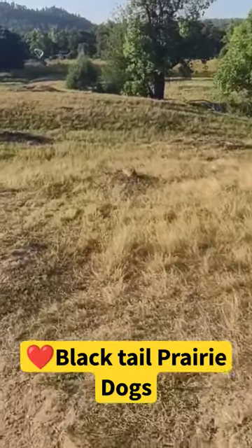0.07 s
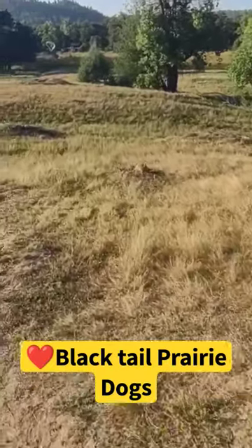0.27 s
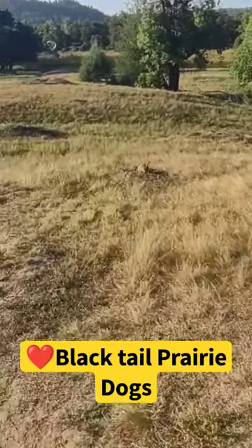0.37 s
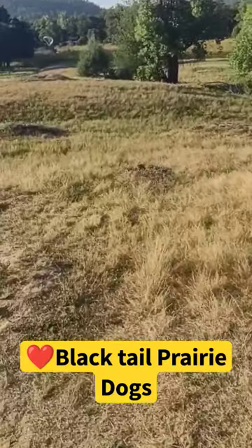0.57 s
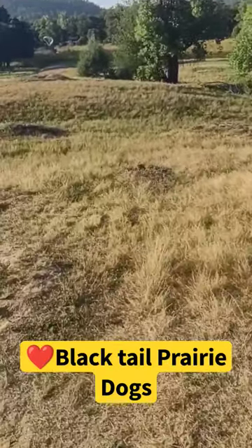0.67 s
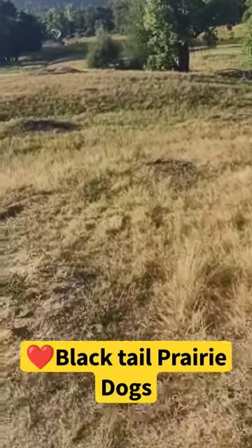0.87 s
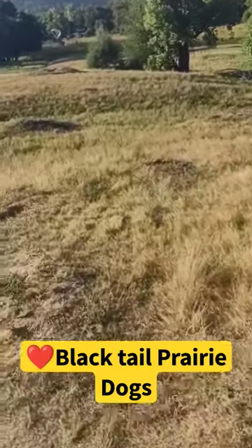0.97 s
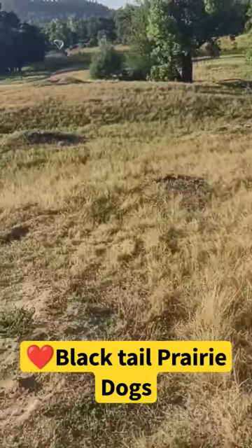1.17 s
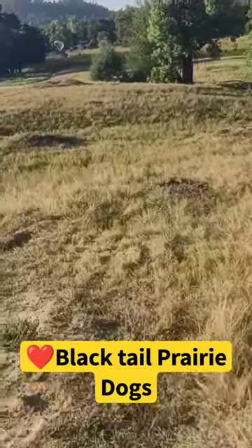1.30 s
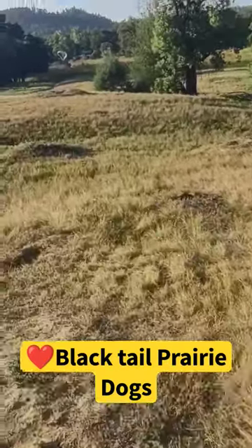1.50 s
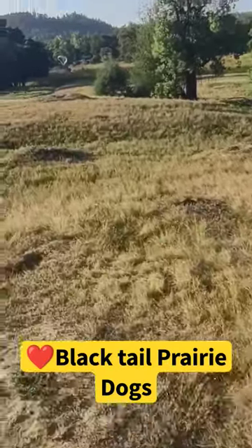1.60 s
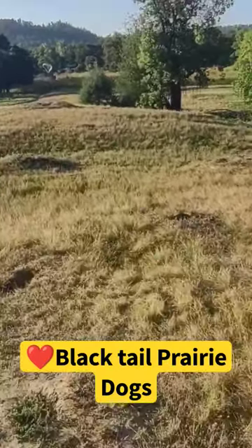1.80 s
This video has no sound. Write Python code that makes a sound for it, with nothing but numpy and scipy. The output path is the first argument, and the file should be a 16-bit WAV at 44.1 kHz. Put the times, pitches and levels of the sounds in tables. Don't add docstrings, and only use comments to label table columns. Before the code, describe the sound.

Two sharp, chirpy rodent barks, each about 0.05 seconds long with a rough, quickly rising and falling pitch near 2 kHz and bright overtones, come at 0.86 and 1.34 seconds, the second stronger. Faint smeared echoes follow from trees. Low wind thuds hit the microphone, heavily on the right from 0.25 to 0.4 and around 0.75-0.85. Grass sweeps and stalks snap near 0.95, another snaps at 1.25, then it quiets to faint hiss.

```python
import sys
import numpy as np
from scipy import signal
from scipy.fft import rfft, irfft
from scipy.io import wavfile
from scipy.ndimage import uniform_filter1d

SR = 44100
rng = np.random.default_rng(int(sys.argv[2]) if len(sys.argv) > 2 else 0)


def ratio_of_db(decibels):
    return 10 ** (np.asarray(decibels, float) / 20)


def transcribe(u):
    v = np.clip(np.atleast_2d(u).T, -1, 1)
    q = np.round(v * 32767).astype(np.int16)
    wavfile.write(sys.argv[1], SR, q)


N = 81585


def unit_rms(x):
    return x / np.sqrt(np.mean(x ** 2) + 1e-20)


def in_time(rows):
    seconds, *columns = np.transpose(rows)
    return [np.interp(np.arange(N) / SR, seconds, column) for column in columns]


def at_hz(points, hz):
    point_hz, value = np.array(points).T
    return np.interp(np.log(hz + 1), np.log(point_hz), value)


def drift(rate_hz):
    r = np.exp(-2 * np.pi * rate_hz / SR)
    wander = signal.lfilter([1], [1, -2 * r, r * r], rng.standard_normal(N + SR))
    return unit_rms(wander[SR:])


def colour(x, spectrum, tilt_db=0):
    hz = np.fft.rfftfreq(N, 1 / SR)
    gain_db = at_hz(spectrum, hz) + tilt_db * np.log2((hz + 1) / 3000)
    return unit_rms(irfft(rfft(x) * ratio_of_db(gain_db), N))


def pan(left_right_db):
    return np.array([[.5], [-.5]]) * left_right_db


# centre in seconds, peak in dB, pitch in Hz, half length in seconds.
LEFT_EDDIES = [(0.027, -27, 130, 0.0045), (0.047, -22.5, 105, 0.0032), (0.066, -29, 150, 0.0059),
               (0.081, -22, 150, 0.0028), (0.101, -23.5, 110, 0.0057), (0.122, -28, 140, 0.0065),
               (0.137, -33.5, 110, 0.0018), (0.281, -26.5, 82, 0.0056), (0.341, -18.5, 160, 0.0027),
               (0.371, -18, 105, 0.01), (0.402, -21, 120, 0.0055), (0.412, -25, 150, 0.0015),
               (0.537, -25.5, 127, 0.003), (0.625, -30.5, 90, 0.008), (0.665, -27.5, 111, 0.01),
               (0.802, -35, 110, 0.005), (0.895, -29.5, 150, 0.0033), (0.925, -37, 160, 0.0062),
               (0.941, -21.5, 92, 0.009), (0.969, -24.5, 150, 0.0021), (1.002, -37, 90, 0.0055),
               (1.033, -26, 130, 0.0066), (1.062, -24, 96, 0.012), (1.087, -15.5, 140, 0.0027),
               (1.102, -29, 150, 0.0036), (1.409, -26, 97, 0.006), (1.568, -42.5, 358, 0.0023)]
RIGHT_EDDIES = [(0.215, -22.5, 130, 0.004), (0.254, -14, 265, 0.0016), (0.262, -5, 110.4, 0.0081),
                (0.283, -16, 235, 0.0067), (0.306, -3.5, 176.8, 0.0045), (0.331, -13, 121.3, 0.003),
                (0.349, -9, 245, 0.0031), (0.359, -6.5, 160, 0.0013), (0.371, -10.5, 203, 0.0022),
                (0.392, -20, 108.7, 0.018), (0.404, -13.5, 220, 0.0028), (0.453, -17.5, 132, 0.0026),
                (0.497, -25.5, 134.6, 0.0092), (0.649, -16.5, 140, 0.0026), (0.694, -15.5, 92.4, 0.0047),
                (0.746, -8.5, 207, 0.0019), (0.758, -14.5, 82, 0.0079), (0.835, -12, 268, 0.0027),
                (0.842, -6, 144.6, 0.0036), (0.853, -22.5, 264, 0.0034), (0.825, -17, 117, 0.0091),
                (0.873, -19.5, 92, 0.0052), (0.931, -25.5, 112, 0.026), (0.971, -13.5, 162, 0.0035),
                (0.993, -16.5, 216, 0.0034), (1.006, -28, 117.5, 0.006), (1.028, -16.5, 136, 0.0013),
                (1.064, -20, 241, 0.003), (1.147, -29, 200, 0.0015), (1.106, -11, 110.5, 0.0044),
                (1.194, -16, 131, 0.004), (1.209, -15, 260, 0.0026), (1.228, -10, 174, 0.0022),
                (1.246, -20, 132, 0.0092), (1.385, -20, 94, 0.0075), (1.464, -23.5, 86.5, 0.0064),
                (1.573, -38.5, 339, 0.0016)]


def buffets(rows):
    tail_stretch = 1.16
    flick_db, flick_follows, flick_ratio, flick_s = -11.5, 0.23, 1.74, .0016
    out, t = np.zeros(N), np.arange(N) / SR
    for centre_s, db, hz, half_s in rows:
        swing_turn, flick_turn = rng.random(2)
        u = t - centre_s
        width = half_s * np.where(u > 0, tail_stretch, 1 / tail_stretch)
        out += ratio_of_db(db) * np.exp(-.5 * (u / width) ** 2) * np.cos(2 * np.pi * (hz * u + swing_turn))
        v = u + half_s / 2
        flick = np.exp(-.5 * (v / flick_s) ** 2) * np.cos(2 * np.pi * (flick_ratio * hz * v + flick_turn))
        out += ratio_of_db(db + flick_db + flick_follows * (db + 11.5)) * flick
    return out


# time in seconds, left level in dB, right level in dB.
GUST = [(0, -38.5, -53), (0.119, -50, -45), (0.182, -49.5, -48.5), (0.252, -52, -16), (0.361, -34.5, -21),
        (.48, -40.5, -33), (.57, -43, -38.5), (.7, -50.5, -28.5), (0.802, -46.5, -29.5),
        (0.919, -31.5, -27.5), (1.05, -37, -23), (1.302, -40, -34.5), (1.396, -41.5, -21.5),
        (1.522, -41.5, -44), (1.65, -48, -51), (1.85, -56, -53.5)]
# frequency in Hz, level in dB per Hz.
WIND_COLOUR = [(25, -35), (50, -5.5), (90, 5), (160, -2), (260, -13.5), (420, -28.5), (800, -41.5),
               (1500, -82.5)]


def wind():
    lump_db, lumps_per_s = 2.5, 30
    ports = []
    for gust_db, eddies in zip(in_time(GUST), (LEFT_EDDIES, RIGHT_EDDIES)):
        lumps = ratio_of_db(lump_db * drift(lumps_per_s)) * rng.standard_normal(N)
        ports.append(ratio_of_db(gust_db) * colour(lumps, WIND_COLOUR) + buffets(eddies))
    return np.array(ports)


# frequency in Hz, level in dB per Hz.
FIELD_COLOUR = [(200, -4.5), (500, -1.5), (1000, -7.5), (2500, -13.5), (3500, -23.5), (6000, -28.5),
                (11000, -32.5), (15500, -33.5)]


def field_hiss():
    level_db, gust_share = -61.5, .3
    left_db, right_db = in_time(GUST)
    swing_db = uniform_filter1d((left_db + right_db) / 2 + 42, size=6000)
    swell = ratio_of_db(level_db + gust_share * swing_db + drift(6.1))
    return swell * colour(rng.standard_normal((2, N)), FIELD_COLOUR)


# start in seconds, peak in dB, pitch in Hz, left-right in dB, crack in dB.
SNAPS = [
    (.225, -45.5, 1400, -12.5, -27.5),
    (.447, -42.5, 2000, -17, -34.5),
    (.945, -33, 1900, 13, -36),
    (0.962, -39, 1400, -4, -29),
    (0.987, -65, 2500, -1.5, -14),
    (1.245, -34, 1200, -4, -17),
    (1.273, -53.5, 3500, -15.5, -22),
    (1.573, -47, 1600, -13.5, -21),
    (1.77, -53.5, 1900, -17, -24),
]


def snaps():
    ring_cycles, crack_s = 7.9, 0.0033
    out, u = np.zeros((2, N + SR)), np.arange(SR // 20) / SR
    for start_s, db, hz, pan_db, crack_db in SNAPS:
        ring = np.sin(2 * np.pi * hz * u) * ratio_of_db(-60 * u * hz / ring_cycles)
        crack = ratio_of_db(crack_db - 20 * u / crack_s) * rng.standard_normal((2, len(u)))
        i = int(start_s * SR)
        out[:, i:i + len(u)] += ratio_of_db(db + pan(pan_db)) * (ring + crack)
    return out[:, :N]


# start in seconds, length in seconds, level in dB, left-right in dB,
# brightness in dB per octave.
SWISHES = [
    (0.338, .06, -70, -21, 1.5),
    (0.37, 0.14, -66.5, -10, -1),
    (0.479, .16, -65.5, -5.5, 0.5),
    (0.727, 0.058, -58.5, -6.5, -4),
    (0.933, .17, -49, -0.5, -4.5),
    (1.046, 0.05, -55.5, 2.5, -2),
    (1.097, 0.04, -55.5, 8.5, -0.5),
    (1.134, 0.18, -61.5, -6, -4.5),
    (1.606, 0.056, -67, -3.5, 0.5),
]
# frequency in Hz, level in dB per Hz.
GRASS_COLOUR = [(500, -7.5), (1200, 4.5), (2500, 6.5), (3400, -2.5), (4600, -3), (7000, -8.5), (11000, -15),
                (15500, -17)]


def grass():
    grains_per_s = 5500
    out, t = np.zeros((2, N)), np.arange(N) / SR
    for start_s, length_s, db, pan_db, tilt_db in SWISHES:
        hits = rng.random((2, N)) < grains_per_s / SR
        grains = hits * rng.standard_normal((2, N)) * ratio_of_db(3.1 * drift(34))
        sweep = np.sin(np.pi * np.clip((t - start_s) / length_s, 0, 1)) ** 0.18
        out += ratio_of_db(db + pan(pan_db)) * sweep * colour(grains, GRASS_COLOUR, tilt_db)
    return out


# start in seconds, length in seconds, level in dB, centre in Hz,
# width in Hz.
FAR_HISS = [
    (0.493, 0.11, -67.5, 4500, 890),
    (0.958, 0.098, -67, 4160, 500),
]


def far_hiss():
    out, t = np.zeros((2, N)), np.arange(N) / SR
    for start_s, length_s, db, hz, width_hz in FAR_HISS:
        band = signal.butter(2, [hz - width_hz / 2, hz + width_hz / 2], "band", fs=SR, output="sos")
        sweep = np.sin(np.pi * np.clip((t - start_s) / length_s, 0, 1)) ** .5
        out += ratio_of_db(db) * sweep * unit_rms(signal.sosfilt(band, rng.standard_normal((2, N))))
    return out


def bark(pitch, effort, half_pitch, throat):
    jitter_hz, rough_hz, rasp, breath_db = 10, 600, .33, -18
    throb_hz, throb_share, throb_wander = 500, .75, .12
    clean_up_to_hz, high_half_share = 7400, .1
    (hz,), (db, rough), t = in_time(pitch), in_time(effort), np.arange(N) / SR
    hz = uniform_filter1d(hz, size=110) + jitter_hz * drift(420)
    phase = 2 * np.pi * np.cumsum(hz) / SR
    centre_s, half_s, peak_share, base_share = half_pitch
    half_share = base_share + peak_share * np.exp(-.5 * ((t - centre_s) / half_s) ** 2)
    throb_cycles = np.cumsum(throb_hz * (1 + throb_wander * drift(60))) / SR
    throb = throb_share * np.exp(2j * np.pi * throb_cycles)
    out = 0
    for k in np.arange(1, 14) / 2:
        noisy = rasp * (drift(rough_hz) + 1j * drift(rough_hz))
        clean = 1 / (1 + (k * hz / clean_up_to_hz) ** 20)
        shape = clean * (1 + rough * (.7 + 0.3 * k) * (throb + noisy)) + (1 - clean) * 3 * noisy
        share = half_share + (1 - clean) * high_half_share if k % 1 else 1
        partial = np.real(shape * np.exp(1j * (k * phase + rng.uniform(0, 2 * np.pi))))
        out = out + share * ratio_of_db(at_hz(throat, k * hz)) * partial
    out = out + ratio_of_db(breath_db) * colour(rng.standard_normal(N), throat) * rough * 2
    out = out / np.sqrt(uniform_filter1d(out ** 2, size=400))
    return out * ratio_of_db(db) * (t >= effort[0][0]) * (t <= effort[-1][0])


# centre in Hz, width in Hz, gain in dB.
MOUTH_DIPS = [(4500, 250, 3), (5300, 250, -9), (6600, 220, 6), (7000, 150, -4), (7800, 250, -8),
              (9700, 220, -15), (11800, 300, -16), (15300, 500, -22)]


def mouth(x):
    hz = np.fft.rfftfreq(N, 1 / SR)
    gain_db = sum(db * np.exp(-.5 * ((hz - at) / width) ** 2) for at, width, db in MOUTH_DIPS)
    return irfft(rfft(x) * ratio_of_db(gain_db), N)


# time in seconds, pitch in Hz.
PITCH_ONE = [(.855, 1690), (.863, 1860), (.871, 2060), (.877, 2205), (.884, 2165), (.892, 2185), (.9, 2075),
             (.905, 2010), (.91, 1880)]
PITCH_TWO = [(1.337, 1990), (1.343, 2090), (1.349, 2260), (1.354, 2265), (1.359, 2310), (1.366, 2240),
             (1.375, 2050), (1.383, 2015), (1.394, 1790)]
# time in seconds, level in dB, roughness from 0 to 1.
EFFORT_ONE = [(0.856, -46, 0.4), (.861, -37, 0), (0.87, -31, 0.18), (0.894, -29, 0.3), (0.902, -27.5, 0.4),
              (0.907, -42, 0.8), (0.913, -59, 0.83)]
EFFORT_TWO = [(1.337, -58.5, 0.6), (1.34, -33, 0.45), (1.352, -24.5, 0.55), (1.368, -25, 0.44),
              (1.376, -25, 0.38), (1.385, -29.5, 0.54), (1.391, -35.5, 0.78), (1.394, -55, 0.7)]
# frequency in Hz, level in dB.
THROAT_ONE = [(900, -22), (2100, -12), (3200, -8), (4300, 0), (6400, -7.5), (8400, -28.5), (10500, -27.5),
              (14000, -39.5)]
THROAT_TWO = [(1200, -34.5), (2100, -4.5), (3200, -16.5), (4300, 2.5), (6400, -10), (8500, -21.5),
              (10500, -30.5), (14000, -34)]


def rodent():
    first = bark(PITCH_ONE, EFFORT_ONE, (.877, .007, .3, .03), THROAT_ONE)
    second = bark(PITCH_TWO, EFFORT_TWO, (1.355, .01, .06, .03), THROAT_TWO)
    return mouth(first + second)


# delay in seconds, spread in seconds, level in dB.
TREES = [
    (0.109, 0.017, -31.5),
    (0.164, 0.037, -34.5),
]
# frequency in Hz, left-right in dB.
PORT_BALANCE = [(2000, -5), (2300, 5), (3200, 0), (4300, -5.5), (5300, -4), (6400, 1), (10500, 1),
                (13500, 6)]


def field_echo(x):
    left_lead_s, near_db, near_t60_s, leaf_flutter_hz = 0.000323, -27.5, .025, 200
    t = np.arange(SR // 3) / SR
    hz = np.fft.rfftfreq(2 * N, 1 / SR)
    balance = ratio_of_db(pan(at_hz(PORT_BALANCE, hz)))
    delay = np.exp(-2j * np.pi * np.outer([0, left_lead_s], hz))
    ports = rfft(x, 2 * N) * balance * delay
    near = ratio_of_db(near_db - 60 * t / near_t60_s) * rng.standard_normal((2, len(t)))
    far_level = sum(ratio_of_db(db - 40.5) * np.exp(-.5 * ((t - s) / spread) ** 2) for s, spread, db in TREES)
    tree_band = signal.butter(1, [3530, 7530], "band", fs=SR, output="sos")
    far = signal.sosfilt(tree_band, far_level * rng.standard_normal((2, len(t))))
    leaves = np.array([drift(leaf_flutter_hz), drift(leaf_flutter_hz)])
    direct_and_near = irfft(ports * (1 + rfft(near, 2 * N)), 2 * N)[:, :N]
    return direct_and_near + leaves * irfft(ports * rfft(far, 2 * N), 2 * N)[:, :N]


def scene():
    return field_echo(rodent()) + wind() + grass() + snaps() + field_hiss() + far_hiss()


def roll_off(x):
    return signal.sosfilt(signal.butter(12, 15670, fs=SR, output="sos"), x)


def record(dry):
    low_cut_hz, ceiling = 40.4, 0.59
    cut = signal.sosfilt(signal.butter(2, low_cut_hz, "high", fs=SR, output="sos"), dry)
    mix = ceiling * np.tanh(cut / ceiling)
    return roll_off(mix)


dry = scene()
out = record(dry)
transcribe(out)
```